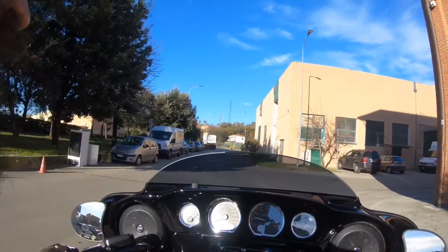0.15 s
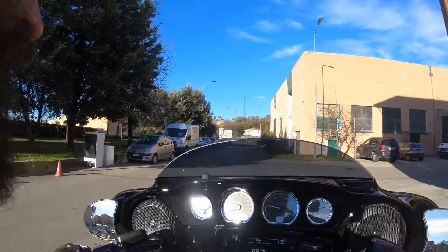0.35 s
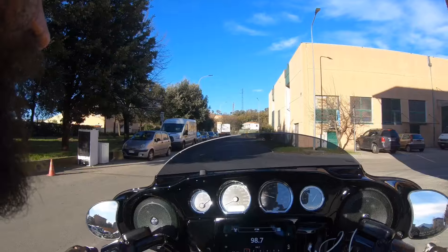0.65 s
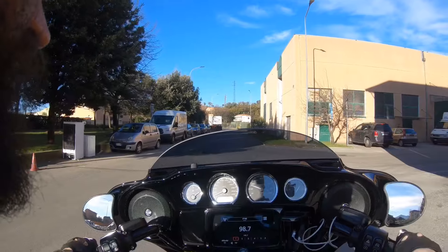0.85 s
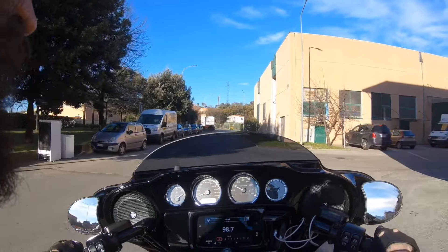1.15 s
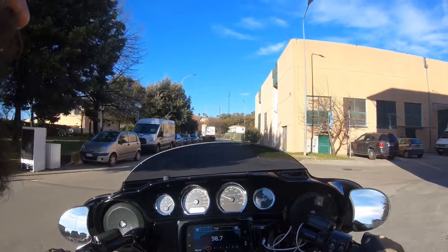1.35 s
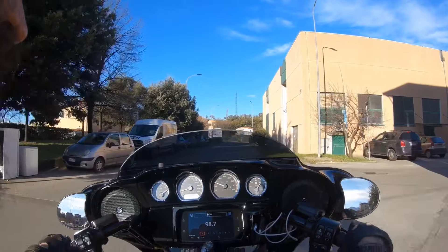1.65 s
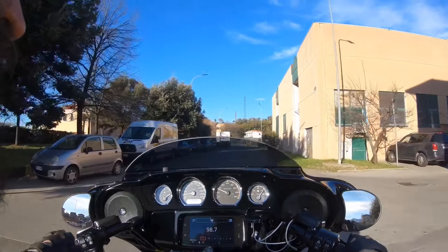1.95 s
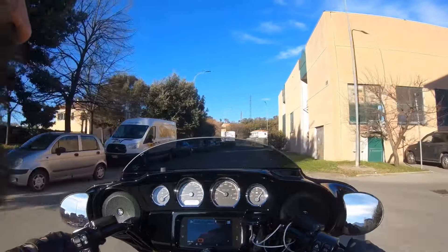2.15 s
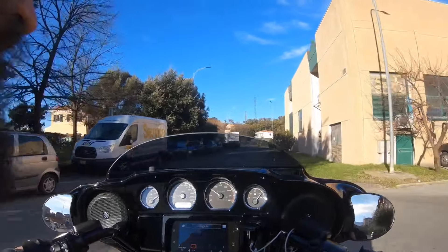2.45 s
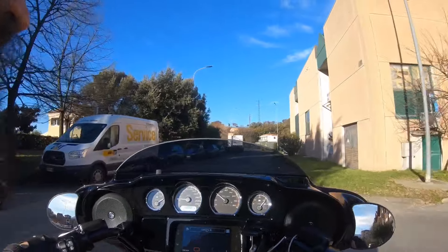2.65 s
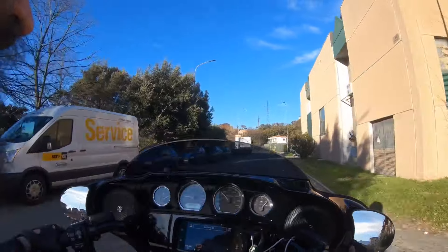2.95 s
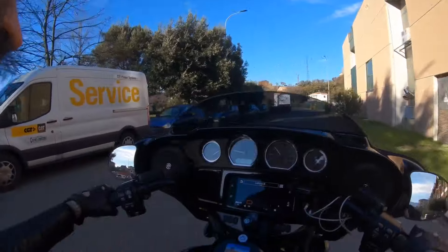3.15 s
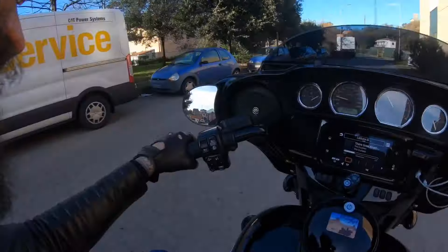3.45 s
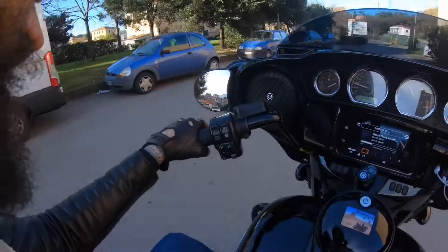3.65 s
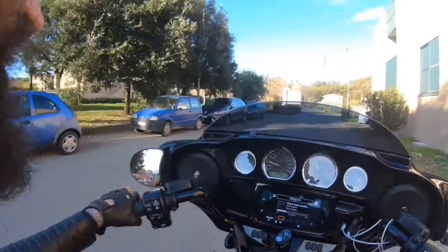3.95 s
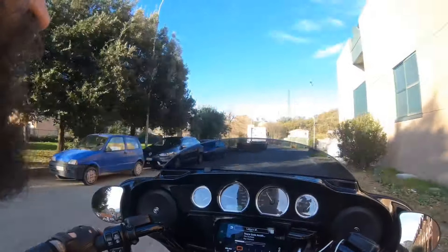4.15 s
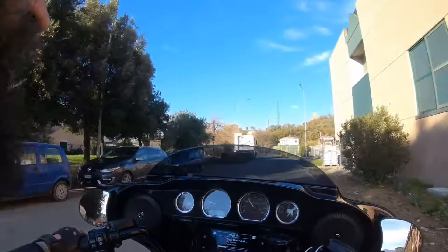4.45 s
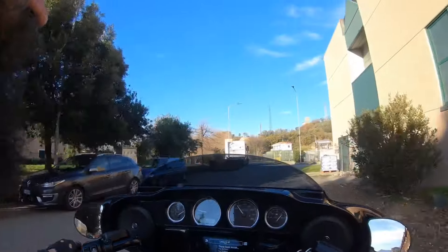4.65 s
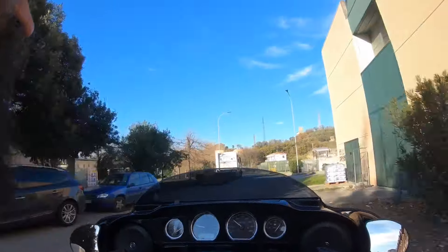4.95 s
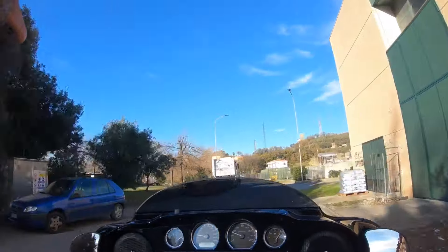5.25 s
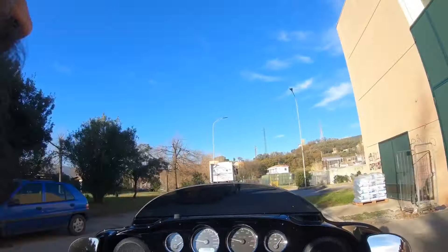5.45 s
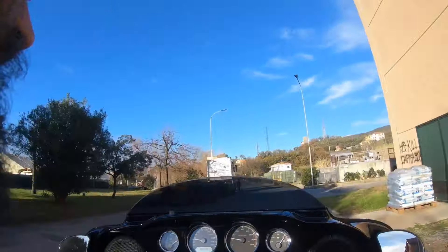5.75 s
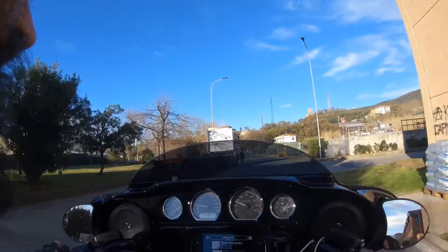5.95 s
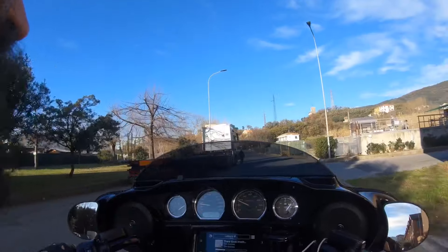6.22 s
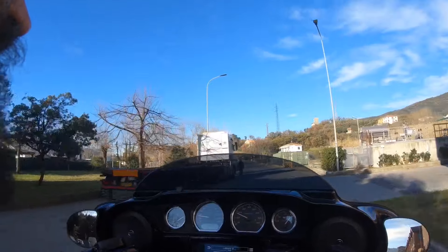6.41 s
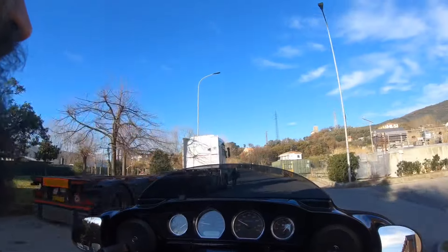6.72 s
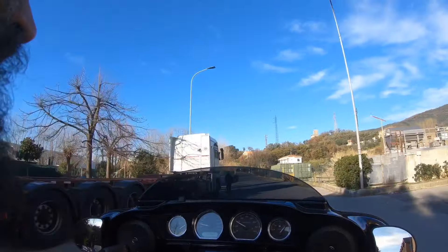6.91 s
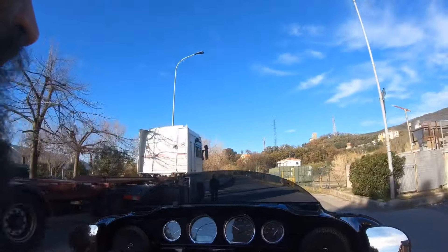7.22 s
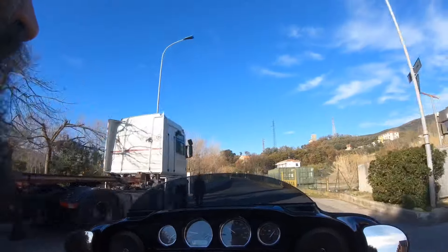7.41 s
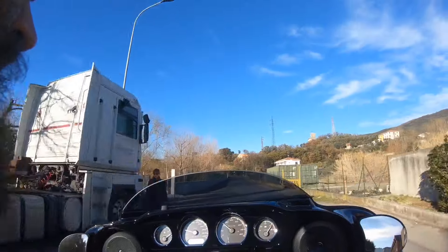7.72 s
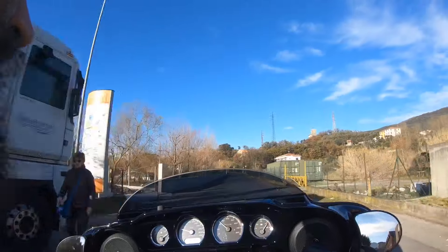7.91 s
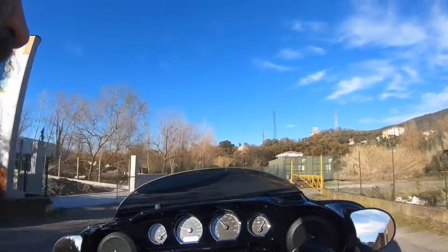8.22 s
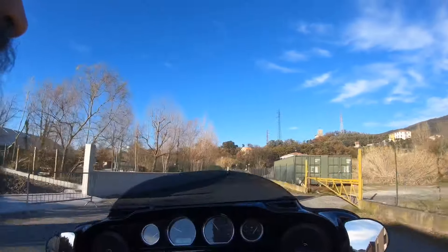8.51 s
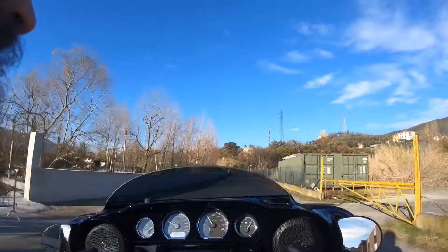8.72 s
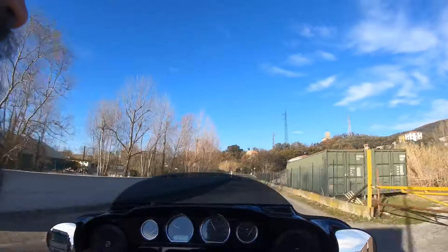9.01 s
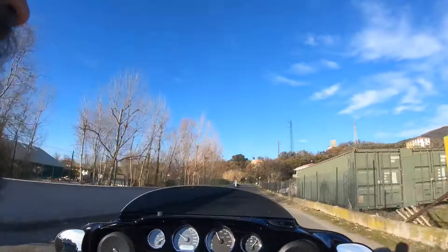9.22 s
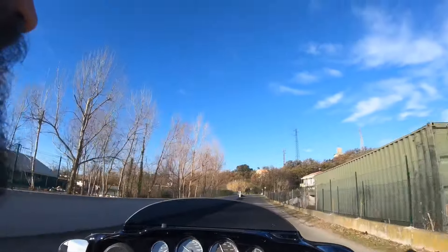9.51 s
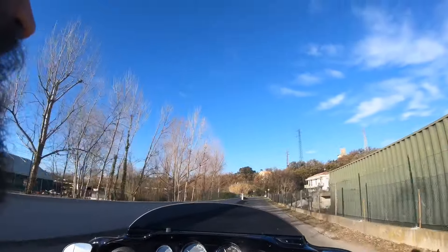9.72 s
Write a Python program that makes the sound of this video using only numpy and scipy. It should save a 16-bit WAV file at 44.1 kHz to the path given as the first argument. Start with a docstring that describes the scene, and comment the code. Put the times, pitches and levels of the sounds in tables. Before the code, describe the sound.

Heard from the rider's helmet, a throbbing motorcycle moves off, dips for a gear change, then accelerates with thuds, rattles and wind.

```python
"""On a road leading away from a brick porch, microphone at the helmet of a rider on a big V-twin motorcycle.
The bike creeps off in first gear, shifts up and gathers speed. Close below, unevenly paired exhaust beats
boom under the engine's clatter and the whine of its gears. The clatter follows the load, hiss and intake
growl follow the throttle, and the clutch whirs as it takes up the drive. As the pace rises, bumps thud
through the frame and rattle the fairing, a wheel strikes loose iron, and wind rumbles at the microphone."""
import sys
import numpy as np
from scipy import signal
from scipy.io import wavfile
from scipy.ndimage import uniform_filter1d, minimum_filter1d

SR = 44100
rng = np.random.default_rng(int(sys.argv[2]) if len(sys.argv) > 2 else 0)


def inscribe(sig):
    """Save sig as 16-bit PCM at rate SR to the path in sys.argv[1].

    A 1-D sig is mono; a 2-D sig holds one channel per row.
    Samples are clipped to [-1, 1] before scaling.
    """
    pcm = np.round(np.clip(np.atleast_2d(sig).T, -1, 1) * 32767)
    wavfile.write(sys.argv[1], SR, pcm.astype(np.int16))


N = 435266
TIME = np.arange(N) / SR
VEE = 315 / 720  # share of a four-stroke cycle between the two firings of a 45 degree vee


def amp(db):
    """Decibels to gain."""
    return 10 ** (np.asarray(db) / 20)

def unit_rms(x):
    """Scales to rms 1."""
    return x / np.sqrt(np.mean(x ** 2) + 1e-20)

def add(mix, start_s, sound):
    """Mixes a sound in at start_s."""
    part = mix[round(start_s * SR):][:len(sound)]
    part += sound[:len(part)]

def curve(rows):
    """A time table at every sample."""
    return np.interp(TIME, *np.transpose(rows))

def swells(rows):
    """Smooth humps in time, one for each (middle_s, half_length_s, height)."""
    return sum(height * np.exp(-((TIME - s) / half) ** 2) for s, half, height in rows)

def drift(hz):
    """A random wander of rms 1, changing about hz times a second."""
    knots = rng.standard_normal(4096)
    return unit_rms(np.interp(TIME * hz, np.arange(len(knots)), knots))

def spectrum_db(points, hz):
    """A spectrum's level at hz, on a log-frequency axis."""
    freqs, levels = np.transpose(points)
    return np.interp(np.log(hz + 1), np.log(freqs + 1), levels)

def colour(x, body, modes=(), size=16384):
    """Sounds x through a body: a causal filter with that spectrum and resonant peaks."""
    hz = abs(np.fft.fftfreq(size, 1 / SR))
    peaks_db = sum(peak / (1 + (2 * (hz - f) / width) ** 2) for f, width, peak in modes)
    log_gain = np.log(amp(spectrum_db(body, hz) + peaks_db))
    response = np.exp(np.conj(signal.hilbert(log_gain)))  # minimum phase
    return signal.oaconvolve(x, np.fft.ifft(response).real[:size // 2])[:N]

def scatter(count, spread_db):
    """Random gains that make strokes uneven."""
    return amp(spread_db * np.clip(rng.standard_normal(count), -2, 2))

def burst(force, body, modes=()):
    """Noise of rms force, sounding through a body."""
    noise = rng.standard_normal(N)
    return colour(force * noise, body, modes) / np.std(colour(noise, body, modes))

def crackle(force, body, pops_per_s=1500):
    """Tiny random pops of rms force, sounding through a body."""
    pops = (rng.random(N) < pops_per_s / SR) * rng.choice([-1, 1], N) * scatter(N, spread_db=4)
    return colour(force * pops, body) / np.std(colour(pops, body))

def die_away(pulses, decay_s):
    """Gives each pulse an exponential tail."""
    return signal.lfilter([1], [1, -np.exp(-1 / (decay_s * SR))], pulses)

def flaring_noise(at, decay_s, steady, uneven_db):
    """Two noises that flare above a steady floor at the given samples."""
    knocks = np.zeros(N)
    knocks[at] = scatter(len(at), uneven_db)
    return (steady + die_away(knocks, decay_s)) * rng.standard_normal((2, N))

def blow_force(blows):
    """The force of blows that land at once and die away."""
    return sum(amp(db) * (TIME > s) * np.exp(-abs(TIME - s) / decay) for s, db, decay in blows)

def widen(pair, width):
    """Turns two unrelated noises into left and right; width 0 is mono."""
    side = width * pair[1]
    return np.array([pair[0] + side, pair[0] - side])

def crossings(cycles):
    """The samples at which a cycle completes."""
    return np.flatnonzero(np.diff(np.floor(cycles)) > 0)

def gulps(cycles, rear=.45, uneven_db=1.5):
    """One pressure pulse for each cylinder in every cycle; the rear one is weaker."""
    pulses = np.zeros(N)
    for lag, strength in ((VEE / 2, 1), (-VEE / 2, rear)):
        pulses[1:] += strength * np.diff(np.floor(cycles + lag))
    return pulses * amp(uneven_db * drift(30))


# The exhaust, heard from the saddle: time_s, level_db
EXHAUST_LEVEL = [(0, -17.5), (.7, -15), (1.3, -16), (1.7, -20), (2.05, -16.5), (2.55, -15), (2.75, -19),
                 (3.35, -14.5), (3.55, -19), (3.74, -15.5), (3.9, -17.5), (4.07, -16), (4.4, -19),
                 (4.6, -16), (4.87, -15), (5, -29.5), (5.35, -31.5), (6.4, -18.5), (6.85, -17),
                 (7.3, -19.5), (8.6, -18), (9.87, -20.5)]
# Tone of one pair of beats: engine_multiple, level_db
BEAT_ORDERS = [(1, -2), (2, 2), (3, -8.5), (4, -1), (5, 3), (6, -4), (7, -1), (8, -7), (9, -9), (10, -5),
               (11, -4.5), (12, -9.5)]
# What the pipes let through: freq_hz, gain_db
PIPE_SPECTRUM = [(12, -14), (24, -13.5), (42, 0), (60, 6.5), (75, 7), (122, 4.5), (140, -3.5), (220, -10),
                 (320, -15), (420, -31.5), (600, -18.5), (1000, -33)]

def exhaust(cycles, speed, uneven_db=0.9, jitter_cycles=0.003, growl_db=-10):
    """The paired beats repeat with the crank; the pipes pass their low orders and a little growl."""
    angle = 2 * np.pi * (cycles + jitter_cycles * drift(25))
    boom, power = np.zeros((2, N))
    for order in range(1, 32):
        pairing = np.cos(np.pi * order * VEE)  # the two cylinders add or cancel
        if order <= len(BEAT_ORDERS):
            weight = np.sign(pairing) * amp(BEAT_ORDERS[order - 1][1])
        else:
            weight = pairing * amp(growl_db)
        pipe_gain = amp(spectrum_db(PIPE_SPECTRUM, order * speed[::256]))
        height = weight * np.interp(TIME, TIME[::256], pipe_gain)
        spread = .8 - .035 * (order - 5) ** 2  # the pipes smear each beat around its strongest order
        boom += height * np.cos(order * angle + spread)
        power += height ** 2 / 2
    return boom / np.sqrt(power) * amp(curve(EXHAUST_LEVEL) + uneven_db * drift(30))


# The brick porch, beside the bike at the start: freq_hz, gain_db
PORCH_SPECTRUM = [(105, -36), (135, -2.5), (172, 0), (200, -18), (900, -110)]

def porch(cycles, level_db=-24.5, fade_db_per_s=10):
    """The engine's pulses boom hollowly in the porch, fading as the bike leaves."""
    return amp(level_db - fade_db_per_s * TIME) * unit_rms(colour(gulps(cycles), PORCH_SPECTRUM))


# The crankcase, close below the microphone: freq_hz, gain_db
CASING_SPECTRUM = [(100, -22), (180, 6.5), (270, 5), (340, -3), (700, -5.5), (1100, -14.5), (1600, -18),
                   (2100, -25), (2900, -33.5), (4000, -28), (8000, -77)]
# Ringing of the engine covers: pitch_hz, width_hz, boost_db
COVER_MODES = [(414.4, 42, 7), (563, 94, 6), (1006, 59, 5.5), (2070, 64, 4), (4230, 60, 1.5),
               (7700, 20, 7.5)]
# The clatter sinks while the bike coasts: middle_s, half_length_s, change_db
COASTS = [(4.6, 0.6, -3)]

def casing(firings, cycles, width, level_db=-39, load_follow=0.67, wide_boost_db=3.5, repeating=.55):
    """The firings knock on the crankcase and its covers; part of the rattle repeats every cycle."""
    drive = flaring_noise(firings, decay_s=0.0089, steady=0.6, uneven_db=4.0)
    pair = np.array([unit_rms(colour(x, CASING_SPECTRUM, COVER_MODES)) for x in drive])
    pattern = np.interp(cycles % 1 * 512, np.arange(512), rng.standard_normal(512))
    rattle = unit_rms(colour(pattern, CASING_SPECTRUM, COVER_MODES))
    pair[0] = np.sqrt(1 - repeating) * pair[0] + np.sqrt(repeating) * rattle
    load_db = curve(EXHAUST_LEVEL) + 19.5  # exhaust level above its nominal value
    clatter_db = level_db + load_follow * load_db + wide_boost_db * width + swells(COASTS)
    return widen(pair, width) * amp(clatter_db)


# Hiss of chain and intake at the helmet, dull and bright: freq_hz, gain_db
DULL_HISS = [(500, -33), (2000, -2), (3300, -8.5), (4200, 3.5), (5000, -1.5), (6200, -1.5), (7000, -17),
             (8500, -23.5), (10500, -35), (16000, -52.5)]
BRIGHT_HISS = [(500, -18.5), (1200, 8.5), (2200, -0.5), (3300, 3), (4800, -2), (5900, 0.5), (7700, -5.5),
               (8700, -12), (16000, -29)]
# Blend of the two: time_s, bright_share
BRIGHTNESS = [(1.1, 0.75), (1.35, 0.7), (1.7, 0.04), (5.1, 0.1)]
# The rider eases the throttle: middle_s, half_length_s, depth_share
THROTTLE_LIFTS = [(1.72, 0.39, 0.19), (5.33, 0.35, 0.84), (9.75, 0.68, 0.37)]
# The rider's head tips toward the engine and uncovers its hiss: middle_s, half_length_s, rise_db
GLANCES = [(3.21, 0.065, 6.5), (3.7, 0.69, 6), (3.9, 0.06, 5)]

def valve_gear(cycles, width, level_db=-59, throttle_shut_db=-15, bright_db=12):
    """Four valves tick in every cycle over the hiss of chain and intake."""
    drive = flaring_noise(crossings(4 * cycles), decay_s=0.011, steady=3.1, uneven_db=4.0)
    dull = unit_rms(colour(drive[0], DULL_HISS, COVER_MODES))
    bright = np.array([unit_rms(colour(x, BRIGHT_HISS, COVER_MODES)) for x in drive])
    share = curve(BRIGHTNESS)
    hiss = (1 - share) * dull + amp(bright_db) * share * widen(bright, width)
    return hiss * amp(level_db + throttle_shut_db * swells(THROTTLE_LIFTS) + swells(GLANCES))


# Covers and panels buzzing near the rider: middle_s, half_length_s, pitch_hz, width_hz, level_db
BUZZES = [(0.25, .3, 2100, 200, -52), (1.35, .5, 255, 90, -36), (2.08, .1, 555, 50, -37.5),
          (2.35, .1, 1660, 35, -56), (3.33, .16, 560, 55, -38), (4.05, .6, 1540, 300, -55),
          (6.4, .4, 615, 130, -44)]

def cover_buzz(firings):
    """Covers and panels buzz at their own pitch while the firings shake them."""
    drive = flaring_noise(firings, decay_s=0.012, steady=0.35, uneven_db=2.5)[0]
    out = np.zeros(N)
    for s, half, hz, width_hz, db in BUZZES:
        b, a = signal.iirpeak(hz, hz / width_hz, SR)
        ring = signal.lfilter(b, a, signal.lfilter(b, a, drive))
        out += swells([(s, half, amp(db))]) * unit_rms(ring)
    return out


# Wind right on the microphone: time_s, level_db
WIND_LEVEL = [(0, -35), (1.8, -32), (1.95, -27), (3.6, -27), (4.3, -30), (4.85, -25), (5.35, -30),
              (6.1, -27.5), (7.4, -21), (8.6, -22), (9.35, -18.5), (9.62, -24)]
# Its rumble: freq_hz, gain_db
WIND_SPECTRUM = [(10, -3.5), (30, 6), (45, 9.5), (90, 5), (140, 5.5), (300, -14), (600, -27.5),
                 (1200, -31.5), (9000, -110)]

def wind(lumpy_db=2.0, flap_offset_db=-13, gusty_db=3):
    """Eddies tumble over the helmet: a lumpy rumble, and small flaps that only strong wind raises."""
    level_db = curve(WIND_LEVEL)
    eddies = rng.standard_normal(N) * amp(lumpy_db * drift(45))
    rumble = unit_rms(colour(eddies, WIND_SPECTRUM)) * amp(level_db)
    flap_db = 2 * level_db - level_db.max() + flap_offset_db  # flaps grow twice as fast as the rumble
    flaps = crackle(amp(flap_db + gusty_db * drift(60)), FRAME_SPECTRUM)  # as dull as the frame's thud
    return rumble + flaps


# The clutch slips or the bike coasts: middle_s, half_length_s, level_db
WHIRS = [(0.505, 1, -52), (4.616, 0.59, -65), (6.203, 0.77, -58)]
# The whir, heard from the saddle: freq_hz, gain_db
WHIR_SPECTRUM = [(200, -80), (900, -26), (1600, -5.5), (2020, -1.5), (3100, -9), (8000, -80)]

def drive_whir():
    """The drive whirs as the bike moves off, as it coasts, and again after the gear change."""
    return burst(swells([(s, half, amp(db)) for s, half, db in WHIRS]), WHIR_SPECTRUM)


# The throttle opens on moving off: middle_s, half_length_s, level_db
THROTTLE_BLIPS = [(0.59, 0.09, -32), (0.9, 0.22, -30), (1.23, 0.07, -30.5)]
# The air box, close below the rider: freq_hz, gain_db
AIRBOX_SPECTRUM = [(60, -19.5), (130, -2), (220, 1), (340, -10), (600, -10.5), (900, -24), (2500, -49.5),
                   (8000, -110)]
# Its ringing: pitch_hz, width_hz, boost_db
AIRBOX_MODES = [(258.6, 54, 10), (412, 90, 9.8), (551, 72, 12.7)]

def intake(cycles, rasp_db=-17, decay_s=0.035):
    """With the throttle open each gulp of air rings the air box and rasps past the throttle plate."""
    pulses = gulps(cycles)
    duct_echoes = rng.standard_normal(SR // 20) * np.exp(-TIME[:SR // 20] / decay_s)
    growl = unit_rms(colour(signal.oaconvolve(pulses, duct_echoes), AIRBOX_SPECTRUM, AIRBOX_MODES))
    rush = die_away(pulses, decay_s) * rng.standard_normal(N)
    rasp = amp(rasp_db) * unit_rms(colour(rush, WHIR_SPECTRUM))
    throttle = swells([(s, half, amp(db)) for s, half, db in THROTTLE_BLIPS])
    return throttle * (growl + rasp)


# Gear whines, faint at the helmet: start_s, end_s, engine_multiple, level_db
WHINES = [(2.0, 2.38, 93.5, -53.5), (2.4, 3.5, 62.3, -53), (2.55, 3.3, 93.5, -59), (2.9, 4.7, 19, -46),
          (3.1, 4.35, 32, -43)]

def gear_whine(cycles, flutter_db=3, waver_rad=.9):
    """Meshing teeth sing at multiples of the engine speed, shaken in every cycle."""
    out = np.zeros(N)
    for start, end, multiple, db in WHINES:
        progress = np.clip((TIME - start) / (end - start), 0, 1)
        swell = np.sqrt(abs(np.sin(np.pi * progress)))
        shake = waver_rad * (drift(70) + np.sin(2 * np.pi * cycles))
        out += amp(db + flutter_db * drift(40)) * swell * np.sin(2 * np.pi * multiple * cycles + shake)
    return out


# Bumps in the road: start_s, thud_db, rattle_db, decay_s
BUMPS = [(2.661, -20.5, -48, 0.047), (4.778, -23, -34, 0.022), (4.958, -21, -43, 0.015),
         (5.455, -23.5, -53, 0.048), (5.648, -23, -49, 0.018), (6.501, -25.5, -41, 0.1),
         (7.211, -21.5, -26.5, 0.019), (7.276, -28, -33.5, 0.082), (7.423, -21.5, -30, 0.034),
         (7.555, -16.5, -32, 0.013), (8.303, -17, -26, 0.029), (8.465, -17.5, -26, 0.022),
         (8.835, -26, -32.5, 0.055), (8.967, -24, -39.5, 0.071), (9.084, -16.5, -30, 0.018),
         (9.207, -17, -24, 0.025), (9.254, -27, -31.5, 0.032), (9.394, -13.5, -22, 0.027)]
# The frame under the rider and the fairing just ahead: freq_hz, gain_db
FRAME_SPECTRUM = [(50, -16), (130, 1.5), (210, 1.5), (330, -7.5), (600, -16), (1200, -33), (3000, -49.5),
                  (9000, -100)]
FAIRING_SPECTRUM = [(100, -25), (350, 6), (600, 6), (1000, -4.5), (1900, -14), (3200, -32.5), (6000, -38.5),
                    (9000, -62.5)]

def bumps(rise_s=0.0027):
    """Each bump in the road thuds through the frame and shakes the fairing."""
    thud, shake = np.zeros((2, N))
    age = TIME[:SR // 2]
    for s, thud_db, rattle_db, decay_s in BUMPS:
        shape = (1 - np.exp(-age / rise_s)) * np.exp(-age / decay_s)
        add(thud, s, amp(thud_db) * shape)
        add(shake, s, amp(rattle_db) * shape)
    return burst(thud, FRAME_SPECTRUM) + crackle(shake, FAIRING_SPECTRUM)


# The gear lever, down at the rider's foot: start_s, level_db, decay_s
LEVER_CLUNKS = [(5.075, -35, 0.03), (5.13, -39.5, 0.033)]
# Tone of a clunk: freq_hz, gain_db
LEVER_SPECTRUM = [(100, -32), (500, 19), (1000, 3.5), (2200, -6.5), (5800, -22), (8000, -70)]

def gear_lever():
    """Metal strikes metal twice as the lever shifts up."""
    return burst(blow_force(LEVER_CLUNKS), LEVER_SPECTRUM)


def clack(hz, width_hz=260, ring_db=7, buzz=0.12, buzz_s=0.0062):
    """One panel strikes its mount, buzzes for a moment and rings at its own pitch; peak 1."""
    age = TIME[:1024]
    force = (age == 0) + buzz * np.exp(-age / buzz_s) * rng.standard_normal(len(age))
    sound = colour(force, FAIRING_SPECTRUM, [(hz, width_hz, ring_db)], size=1024)
    return sound / abs(sound).max()

# Hard knocks of the fairing, just ahead of the microphone: start_s, level_db, pitch_hz
PANEL_CLACKS = [(7.215, -21, 600), (7.57, -21.5, 700), (8.264, -23.5, 1095), (8.407, -24.5, 1300),
                (8.632, -23.5, 1100), (8.855, -25, 700), (8.875, -19, 720), (8.948, -26, 880),
                (8.972, -23, 520), (9.215, -20, 888), (9.232, -20, 1150), (9.258, -21, 1310),
                (9.419, -20, 977), (9.658, -25.5, 907)]
# Small knocks of loose parts: time_s, top_level_db
LOOSE_LEVEL = [(6.3, -38), (7.4, -30), (9.3, -29.5), (9.8, -40)]

def panels(hard_boost_db=2.5, loose_count=380, spread_db=8, low_hz=350, high_hz=1800):
    """The fairing knocks hard on the fast stretch, among many small knocks of loose parts."""
    out = np.zeros(N)
    for s, db, hz in PANEL_CLACKS:
        add(out, s, amp(db + hard_boost_db) * clack(hz))
    times, levels = np.transpose(LOOSE_LEVEL)
    for when, softness, pitch in rng.random((loose_count, 3)):
        s = times[0] + when * (times[-1] - times[0])
        hz = low_hz * (high_hz / low_hz) ** pitch
        add(out, s, amp(np.interp(s, times, levels) - spread_db * softness) * clack(hz))
    return out


# Loose iron in the road, passing under the wheel: start_s, level_db, decay_s
IRON_CLANKS = [(7.982, -25.5, 0.037), (8.014, -25.5, 0.067)]
# Tone of the iron: freq_hz, gain_db
IRON_SPECTRUM = [(100, 5), (300, 7.5), (700, -4.5), (1700, -16), (3000, -29.5), (5500, -32.5),
                 (10000, -94.5)]
# Its ringing: pitch_hz, width_hz, boost_db
IRON_MODES = [(900, 230, 13), (1400, 400, 5), (2250, 200, 8)]

def road_iron():
    """The wheel strikes and scrapes loose iron, which rings briefly."""
    return burst(blow_force(IRON_CLANKS), IRON_SPECTRUM, IRON_MODES)


# Four-stroke engine speed along the road: time_s, cycles_per_s
ENGINE_SPEED = [(0, 10.64), (0.39, 11.59), (0.5, 13.3), (0.72, 14.55), (0.92, 16.44), (1.13, 14.13),
                (1.77, 14.2), (2.3, 17.87), (3.1, 21.86), (3.85, 22.34), (4.54, 21.79), (5.01, 14.46),
                (5.33, 11.55), (6.11, 13.4), (6.97, 16.69), (8.12, 22.29), (8.92, 25.36), (9.87, 24.78)]

def scene(boom_left_db=-3.0, clatter_left_db=-4.5, hiss_left_db=3.5, wide_until_s=1.31, mono_from_s=2.25):
    """The crank times the engine; boom and clatter start to the right, hiss to the left, then all centre."""
    speed = curve(ENGINE_SPEED)
    cycles = .378 + np.cumsum(speed) / SR  # the crank starts partway through a cycle
    firings = np.concatenate([crossings(cycles + lag) for lag in (-VEE / 2, VEE / 2)])
    width = np.interp(TIME, [wide_until_s, mono_from_s], [1, 0])
    lean = np.array([[1], [-1]]) * width / 2
    boom = porch(cycles) + exhaust(cycles, speed)
    clatter = gear_whine(cycles) + intake(cycles) + cover_buzz(firings) + casing(firings, cycles, width)
    engine = boom * amp(boom_left_db * lean) + clatter * amp(clatter_left_db * lean)
    engine += valve_gear(cycles, width) * amp(hiss_left_db * lean)
    return engine + gear_lever() + road_iron() + drive_whir() + bumps() + panels() + wind()

def record(dry, ceiling=.39, cutoff_hz=15700):
    """The helmet microphone feeds a limiter that holds the peaks down, then a low-pass filter."""
    allowed_gain = np.minimum(1, ceiling / (abs(dry).max(0) + 1e-9))
    gain = uniform_filter1d(minimum_filter1d(allowed_gain, size=500), size=900)
    lowpass = signal.firwin(511, cutoff_hz, window=("kaiser", 9), fs=SR)
    return signal.oaconvolve(dry * gain, lowpass[None], "same")


dry = scene()
out = record(dry)
inscribe(out)
```